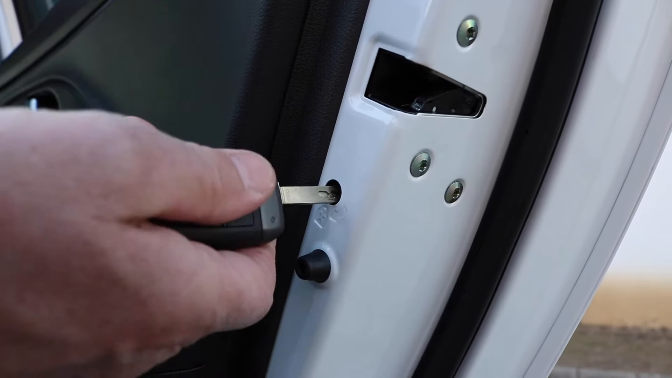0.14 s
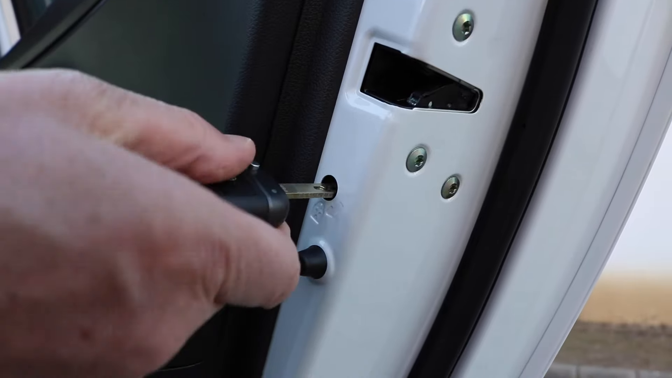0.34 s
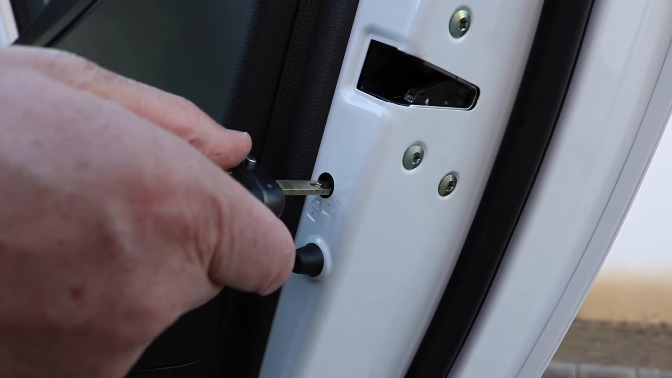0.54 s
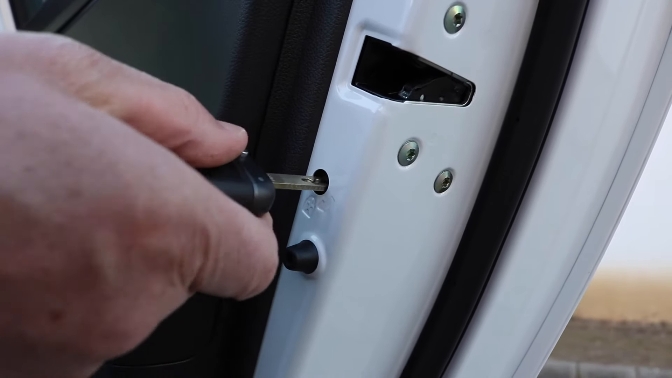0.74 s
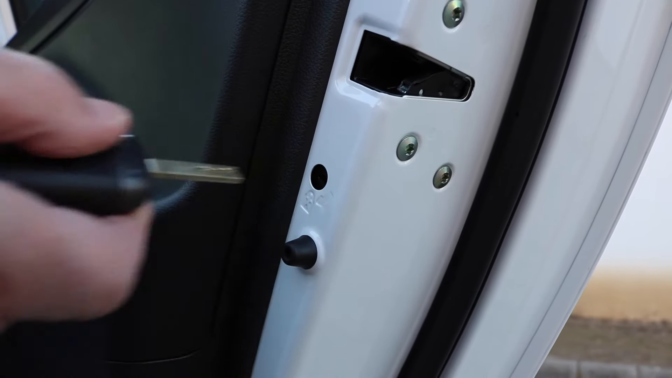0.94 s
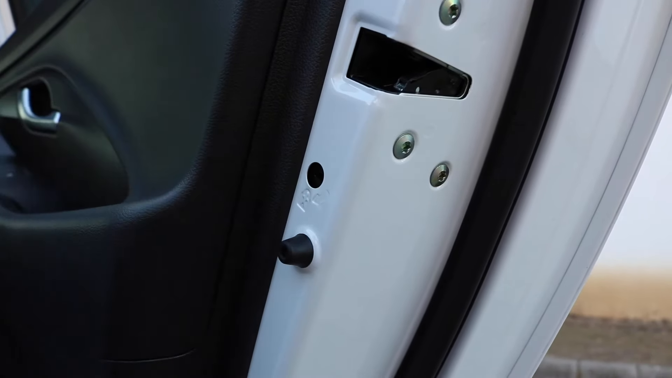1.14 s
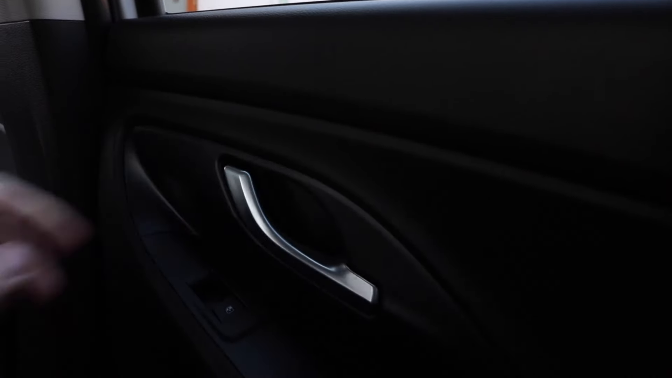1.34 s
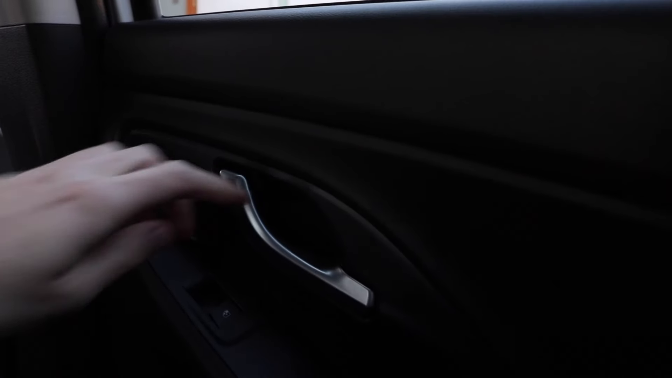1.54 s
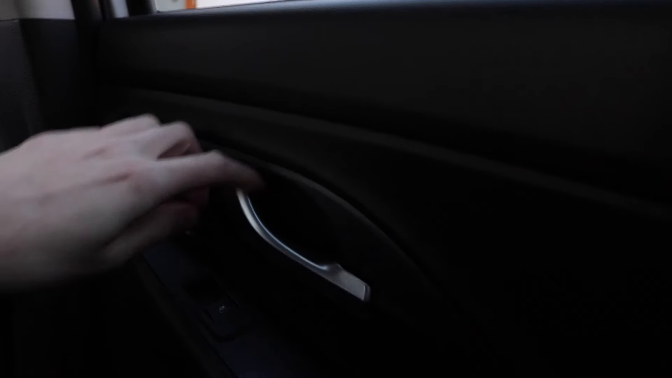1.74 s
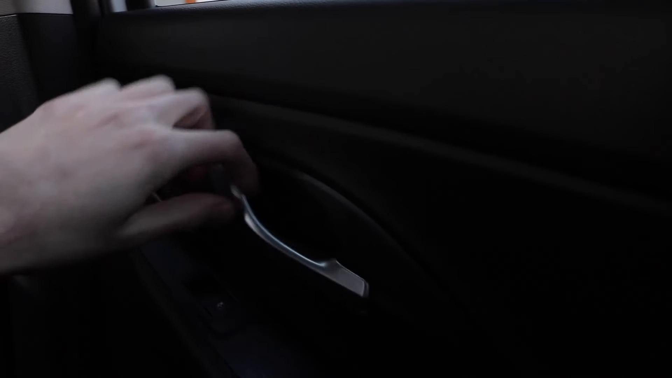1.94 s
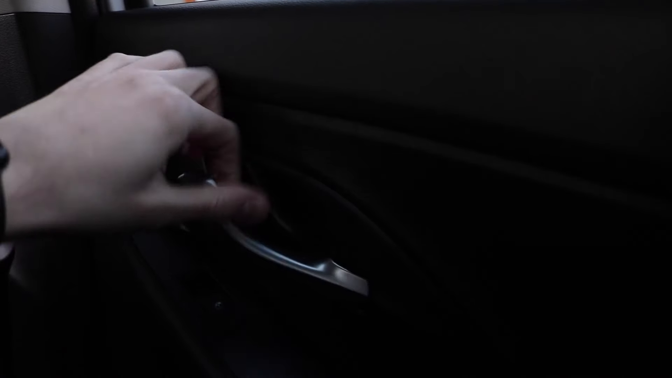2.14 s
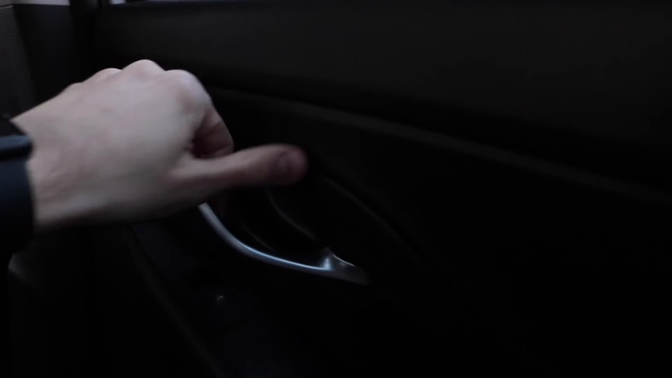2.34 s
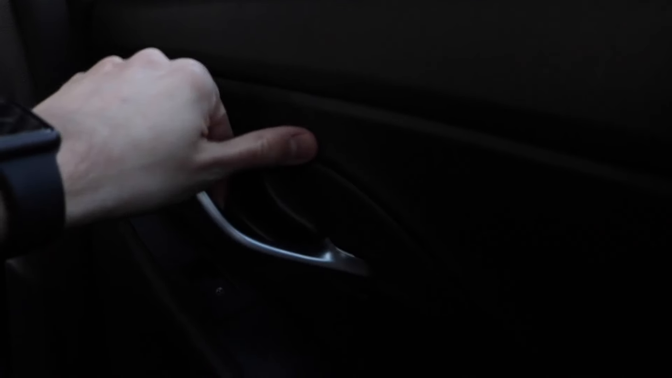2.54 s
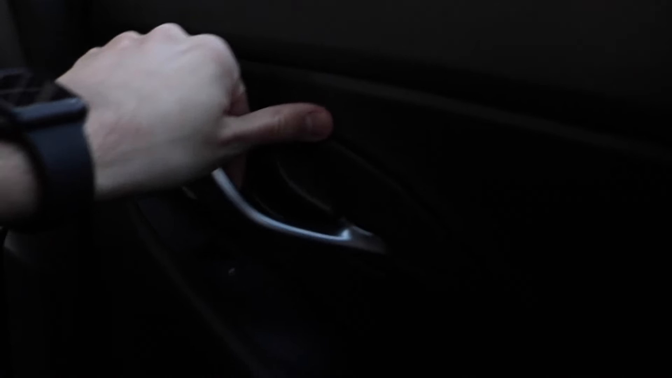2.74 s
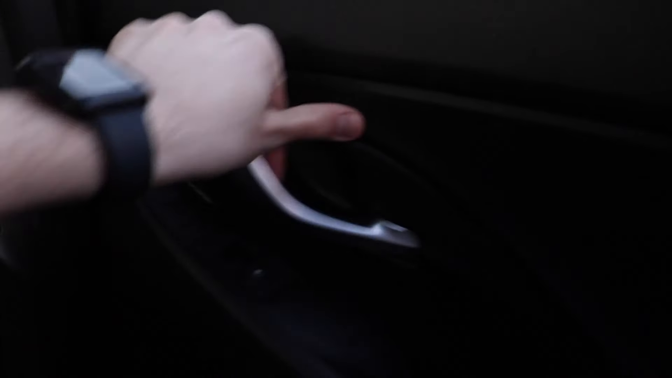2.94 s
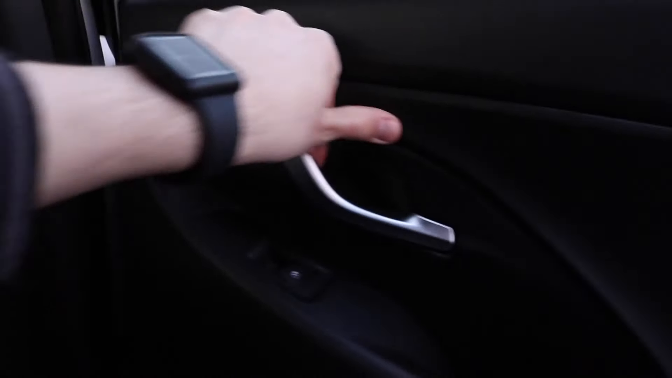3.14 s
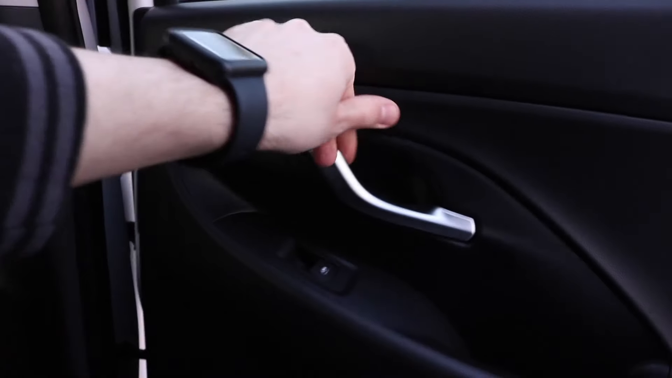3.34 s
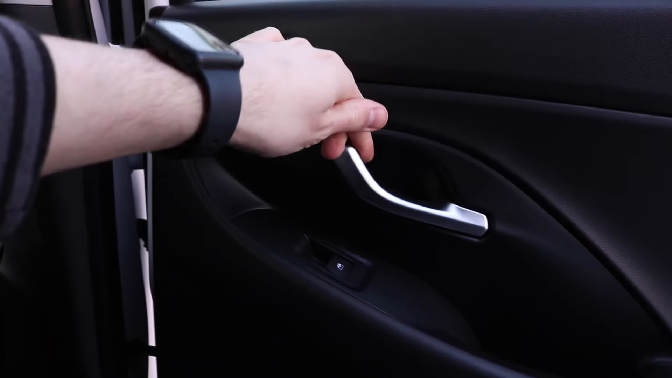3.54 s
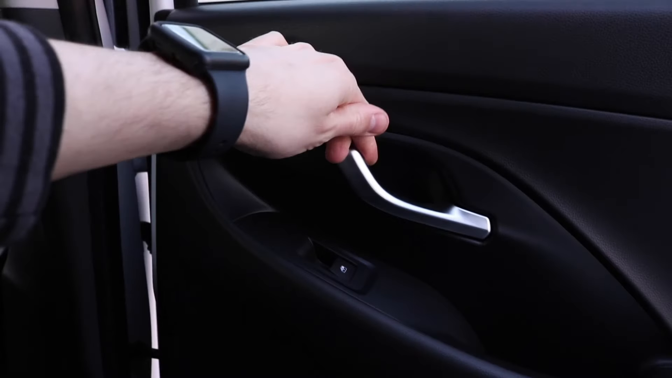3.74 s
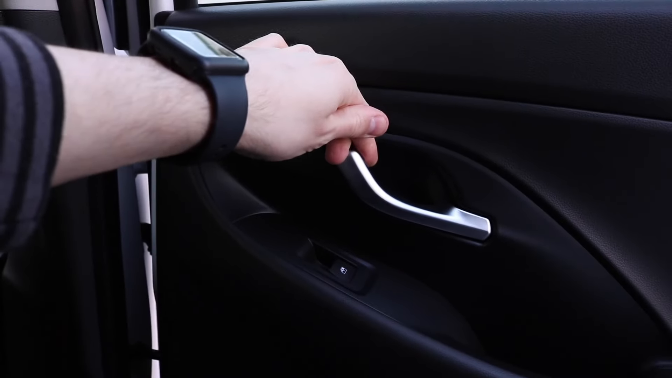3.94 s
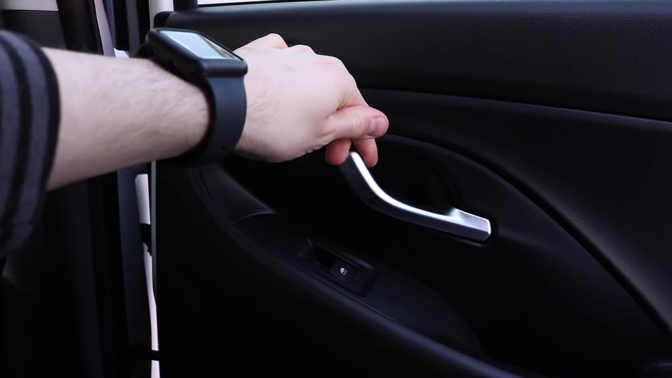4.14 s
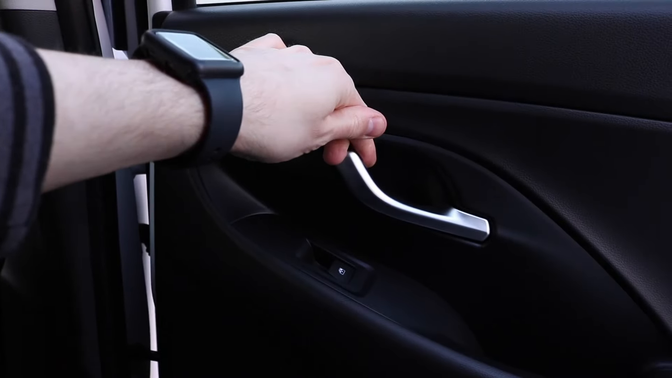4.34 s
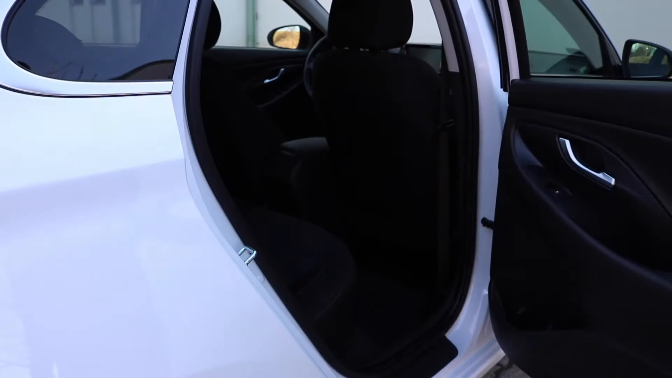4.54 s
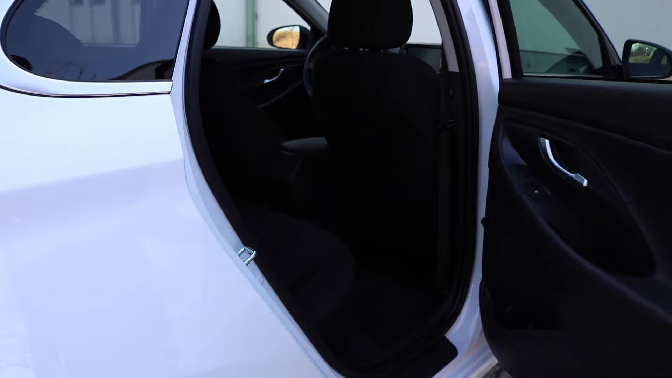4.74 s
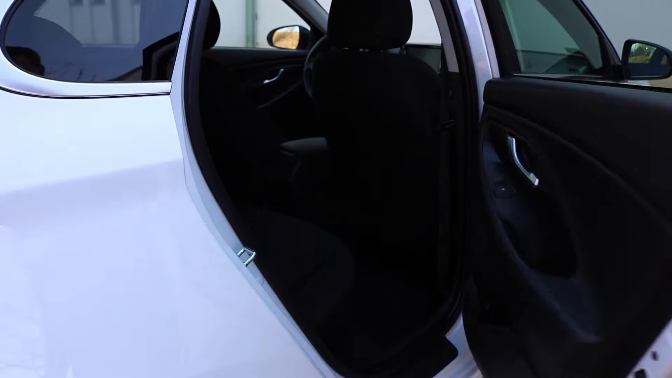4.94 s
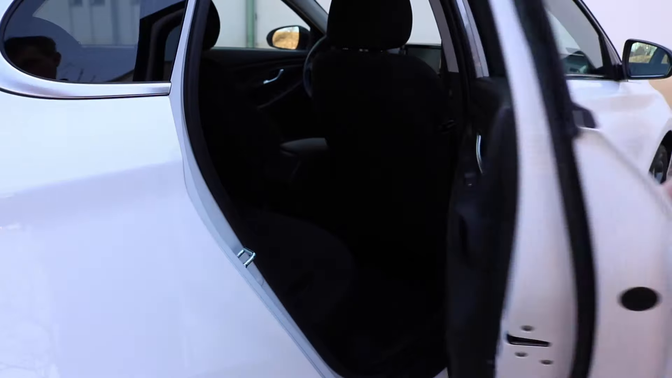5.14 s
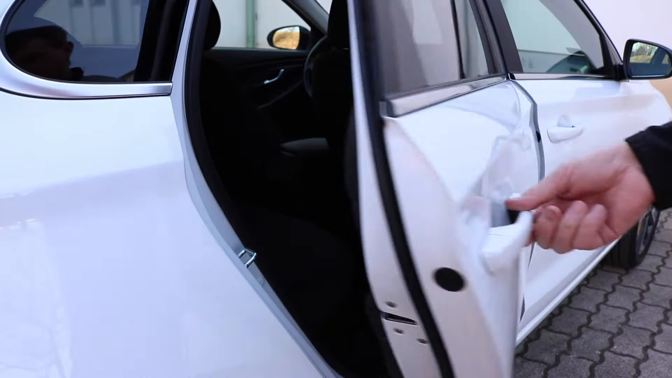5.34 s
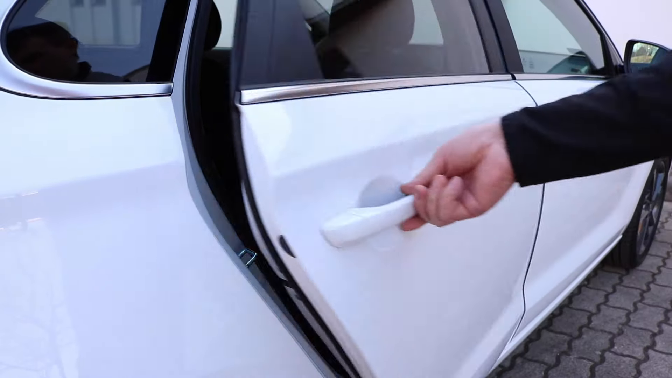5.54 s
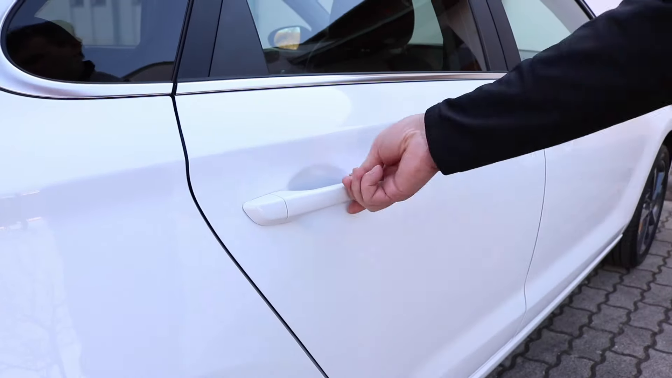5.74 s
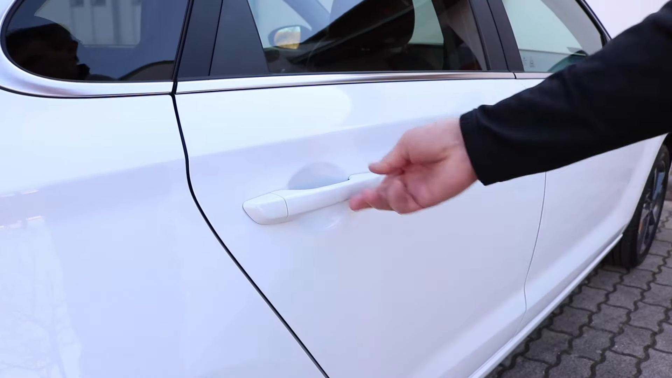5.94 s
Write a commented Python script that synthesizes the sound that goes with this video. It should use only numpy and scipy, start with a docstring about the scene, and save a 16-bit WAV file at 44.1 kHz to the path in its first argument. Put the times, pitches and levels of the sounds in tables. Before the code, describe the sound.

A nearby microphone catches a tiny sharp lock click, light key scrapes, then handle taps and a firm latch clunk. Quiet squeak, creaking and sleeve rustle follow, with small trim knocks and a crisp lever snap. A pause with soft rustle and moving air leads to a loud double clunk as the car door closes, fading quickly into near silence.

```python
"""A car door is heard from close by: pushed shut, its latch meets the striker and the panel slams home.
Before that a key flips the child lock, and a hand pulls the inner handle to let the latch go.
Blows excite decaying modes (sines) and dense clatter (noise bands), low-passed by the contact.
Shaped noise gives the sliding fingers, rustle, scrapes, moved air and faint background;
an unsteady sine gives the squeak of the seal, and trains of tiny blows the creaking lever."""
import sys
import numpy as np
from scipy import signal
from scipy.fft import rfft, irfft
from scipy.io import wavfile
from scipy.ndimage import uniform_filter1d

SR = 44100
rng = np.random.default_rng(int(sys.argv[2]) if len(sys.argv) > 2 else 0)


def waveform_to_disk(signal):
    """Save audio, clipped to [-1, 1], as 16-bit WAV at the path in sys.argv[1]."""
    frames = np.transpose(np.atleast_2d(signal))
    scaled = np.clip(frames, -1, 1) * 32767
    samples = np.round(scaled).astype(np.int16)
    wavfile.write(sys.argv[1], SR, samples)


N = 264600  # samples, 6 s
HZ = np.fft.rfftfreq(N, 1 / SR)
TIME = np.arange(N) / SR


def amp(db):
    """Level to amplitude: 20 dB is a factor of ten."""
    return 10 ** (np.asarray(db) / 20)


def evened(x):
    """Power normalisation: scales a signal to rms 1."""
    return x / np.sqrt(np.mean(x ** 2) + 1e-30)


def burst(x):
    """Energy normalisation: scales a transient to the energy of 10 ms at rms 1."""
    return x * np.sqrt(SR / 100 / np.sum(x ** 2))


def read(points, hz, axis=1):
    """Logarithmic interpolation: one column of a table, in straight lines over log frequency."""
    columns = np.transpose(points)
    return np.interp(np.log(hz + 1), np.log(columns[0] + 1), columns[axis])


def add(mix, s, sound):
    """Superposition: adds a sound into the mix from time s on."""
    part = mix[round(s * SR):][:len(sound)]
    part += sound[:len(part)]


def noise(gain):
    """Spectral shaping: steady noise of rms 1 with a given gain at each frequency."""
    return evened(irfft(rfft(rng.standard_normal(N)) * gain, N))


def unevenness(depth_db, size):
    """Amplitude modulation: a random flutter of rms 1, smoothed over a number of samples."""
    flutter = evened(uniform_filter1d(rng.standard_normal(N), size))
    return evened(amp(depth_db * flutter))


def swells(moves, spectrum):
    """Power summation: noise of one colour under Gaussian swells, one for each move."""
    power = sum((amp(db) * np.exp(-((TIME - s) / half_s) ** 2)) ** 2 for s, half_s, db in moves)
    return np.sqrt(power) * noise(amp(read(spectrum, HZ)))


def ring(modes, t):
    """Modal superposition: decaying sines, listed neighbours starting in opposite directions."""
    tone = np.zeros(len(t))
    for k, (hz, db, t60) in enumerate(modes):
        tone += (-1) ** k * amp(db - 60 * t / t60) * np.sin(2 * np.pi * hz * t)
    return burst(tone)


def clatter(table, t, crack_db, crack_s, rise_cycles=0.69, count=27):
    """High modal density: noise bands crack, then decay at their own rates; bass builds up slowest."""
    centres = np.geomspace(40, 16000, count)[:, None]  # Hz
    # Distance from each band centre, in band spacings
    steps = np.log((np.fft.rfftfreq(len(t), 1 / SR) + 1) / centres) / np.log(centres[1] / centres[0])
    band_gain = np.cos(np.pi / 2 * np.clip(steps, -1, 1))
    bands = irfft(rfft(rng.standard_normal(len(t))) * band_gain, len(t))

    tail = amp(-60 * t / read(table, centres, axis=2))
    crack = amp(crack_db) * np.exp(-t / crack_s)
    rise = 1 - np.exp(-(t * centres / rise_cycles) ** 2)
    bands *= (tail + crack) * rise
    bands /= np.linalg.norm(bands, axis=1, keepdims=True)
    # Band energy is energy per Hz times a bandwidth proportional to the centre
    return burst((bands * amp(read(table, centres)) * np.sqrt(centres)).sum(0))


def struck(blows, modes, dense, crack_db, crack_s, size=16384):
    """Impact excitation: each blow rings an object; a softer contact passes less treble."""
    out, t = np.zeros(N), np.arange(size) / SR
    tone = ring(modes, t)
    for s, ring_db, clatter_db, contact_hz in blows:
        contact = signal.butter(2, min(contact_hz, SR / 2 - 1000), fs=SR)
        rattle = clatter(dense, t, crack_db, crack_s)
        add(out, s, amp(ring_db) * burst(signal.lfilter(*contact, tone)))
        add(out, s, amp(clatter_db) * burst(signal.lfilter(*contact, rattle)))
    return out


def door():
    """Structural resonance: the whole door lands on its seal and shudders in low, slowly dying modes."""
    # Blows of the closing door: (time [s], ring level [dB], clatter level [dB], contact cut-off [Hz])
    blows = [(5.7796, -77, -31, 3030), (5.7831, -24.5, -28, 8800), (5.7966, -46, -36.5, 6860),
             (5.809, -38, -32.5, 1020), (5.817, -50, -44.5, 2400), (5.846, -36.5, -41.5, 890),
             (5.856, -68, -53.5, 2800), (5.884, -68, -57, 2240), (5.9826, -59, -60.5, 3100)]
    # Strongest modes of the door: (frequency [Hz], relative level [dB], t60 [s])
    modes = [(38.9, -4, 0.63), (58, -11, 0.69), (93.2, 5.5, 0.22), (158.4, -4.5, 0.2), (186, -20, 0.284),
             (253, 5.5, 0.11), (291.3, -3.5, 0.38), (318.4, -1, 0.21), (385, 5.5, 0.18), (433, -23, 0.16),
             (494, -12.5, 0.36), (525, -16, 0.45), (600, -3, 0.16), (573, -22, 0.17), (720, -15, 0.2),
             (757, -5, 0.17), (820, -18, 0.26), (878, -7, 0.23), (925, -2, 0.084), (960, -34, 0.16),
             (1030, -25, 0.22), (1110, -9, 0.099), (1070, -18.1, 0.088), (1290, -28, 0.15),
             (1424, -31, 0.15), (1540, -20, 0.21)]
    # Its countless weaker modes: (frequency [Hz], relative energy per Hz [dB], t60 [s])
    dense = [(40, 2.5, 0.39), (150, -4.5, 0.32), (262, 0, 0.26), (446, -3, 0.23), (840, -2.5, 0.13),
             (1400, -7.5, 0.2), (2100, -11.5, 0.16), (2980, -9, 0.057), (3870, -17, 0.12),
             (4830, -19.5, 0.093), (7600, -26, 0.13), (15000, -27, .045)]
    return struck(blows, modes, dense, crack_db=4, crack_s=0.0028)


def striker():
    """Impact excitation: after a soft knock on the door, the latch rides onto the striker and rings it."""
    # Soft knock of hand or check strap on the door, then blows on the striker:
    # (time [s], ring level [dB], clatter level [dB], contact cut-off [Hz])
    blows = [(5.191, -55.5, -69, 260), (5.7511, -27.5, -33.5, 2300), (5.76, -31.5, -30, 1000),
             (5.7673, -36, -31.5, 950)]
    # Strongest modes: (frequency [Hz], relative level [dB], t60 [s])
    modes = [(106, -37, 0.26), (167, -32, 0.2), (257, -12, 0.18), (341, -10.5, 0.14), (431.5, -15, 0.24),
             (572, -1, 0.054), (744, -3.5, 0.015), (788, -14, 0.13), (899, -18.5, 0.29), (1256, -30, 0.064)]
    # Countless weaker modes: (frequency [Hz], relative energy per Hz [dB], t60 [s])
    dense = [(40, -14, 0.26), (150, -5.5, 0.19), (400, -3.5, 0.24), (754, -9.5, 0.12), (1260, -10, 0.16),
             (2000, -23, 0.18), (4020, -27.5, 0.33), (8000, -24, 0.099), (15100, -12, .03)]
    return struck(blows, modes, dense, crack_db=-36, crack_s=0.0054)


def thuds(rise_cycles=0.12):
    """Damped oscillation: knocks and soft bumps flex the broad door skin, which shoves the air."""
    # Flexing of the skin: (time [s], level before rise and decay [dB], frequency [Hz], t60 [s])
    bumps = [(.411, -53, 277, 0.11), (1.315, -62.5, 87.5, .3), (1.731, -61, 220, .09),
             (2.3364, -19.5, 123, 0.048), (2.35, -27, 245.4, .12), (2.803, -46.5, 242, 0.092),
             (3.1164, -39, 400, 0.038), (5.1932, -42.5, 428, 0.036), (5.752, -25.5, 642, 0.039),
             (5.7836, -9, 860, 0.0058), (5.7847, -30.5, 93, 0.15), (5.8103, -21.5, 328, .03)]
    out, t = np.zeros(N), TIME[:SR // 4]
    for s, db, hz, t60 in bumps:
        rise = 1 - np.exp(-t * hz / rise_cycles)
        add(out, s, amp(db - 60 * t / t60) * np.sin(2 * np.pi * hz * t) * rise)
    return out


def latch():
    """Impact excitation: the latch lets go with a thump of low modes and a sharp crack."""
    # Blows in the latch: (time [s], ring level [dB], clatter level [dB], contact cut-off [Hz])
    blows = [(2.338, -39, -55, 430), (2.3452, -30.5, -33, 4900), (2.3487, -25, -41.5, 1420),
             (2.3585, -50, -49.5, 3500), (2.3719, -42, -47.5, 4200)]
    # Strongest modes of the latch: (frequency [Hz], relative level [dB], t60 [s])
    modes = [(44.2, -16, 0.24), (73.5, -12, 0.33), (109.5, -8, 0.3), (168.2, -10.5, 0.3),
             (252.4, 3.5, 0.099), (280, -38, 0.28), (326.5, -11, 0.12), (468.4, 0.1, 0.054),
             (550, -14, 0.072), (737, -7, 0.048), (790, -32, 0.23), (984, -1, 0.028), (1170, -43, 0.12),
             (1356, -23.5, 0.11), (1930, -34, 0.046), (1690, 0, 0.024)]
    # Its countless weaker modes: (frequency [Hz], relative energy per Hz [dB], t60 [s])
    dense = [(49.5, -7, 0.26), (249, 7.5, 0.29), (604, 2, 0.11), (1040, -0.5, 0.14), (1500, -14, 0.069),
             (2050, 0, 0.082), (2520, -36, 0.071), (3160, -5.5, 0.078), (4100, -9.5, 0.053),
             (4800, -25, 0.1), (6560, -26, 0.054), (15000, -31, 0.047)]
    return struck(blows, modes, dense, crack_db=9, crack_s=0.0013)


def rebounding(touches, ring_db, rebound_db):
    """Inelastic rebound: each light touch becomes a landing and one weaker blow after it."""
    rebound_s = 0.0096
    blows = []
    for s, db, contact_hz in touches:
        for delay, loss in ((0, 0), (rebound_s, rebound_db)):
            blows.append((s + delay, db + loss + ring_db, db + loss, contact_hz))
    return blows


def slips(ring_db=-14, count=24):
    """Stick-slip friction: the loaded lever creaks in tiny blows of uneven spacing and strength."""
    # Spells under load: (start [s], end [s], mean slip rate [1/s], mean clatter level [dB])
    creaks = [(2.55, 2.86, 32, -71.5), (3.322, 3.46, 45, -72.5)]
    spread_db, contact_hz = 2.5, 4500  # standard deviation of level, contact cut-off
    blows = []
    for start, end, rate, db in creaks:
        gaps, sizes = rng.uniform(.5, 1.5, count), rng.standard_normal(count)
        times, levels = start + np.cumsum(gaps) / rate, db + spread_db * sizes
        blows += [(s, level + ring_db, level, contact_hz) for s, level in zip(times, levels) if s < end]
    return blows


def lever():
    """Impact excitation: the handle's lever clicks, knocks, creaks and snaps back."""
    # Blows on the lever: (time [s], ring level [dB], clatter level [dB], contact cut-off [Hz])
    blows = [(2.3365, -58, -53.5, 2500), (2.341, -64, -56, 2500), (2.668, -65, -56.5, 2920),
             (2.719, -64, -63, 2400), (3.6396, -37, -43, 10100)]
    # Light touches on the lever: (time [s], clatter level [dB], contact cut-off [Hz])
    touches = [(1.9874, -55, 3780), (2.0715, -60.5, 890), (2.106, -68, 1140), (2.174, -67, 1790),
               (3.339, -62, 2260), (4.466, -67, 700), (4.496, -64, 1070)]
    # Strongest modes of the lever: (frequency [Hz], relative level [dB], t60 [s])
    modes = [(125, -31, 0.23), (224, -22, 0.07), (356, -14.5, 0.072), (545, -6, 0.021), (646, -6, 0.015),
             (874, -46, 0.14), (1283, -18.5, 0.049), (1600, -6.5, 0.034), (1693, -8.5, 0.015),
             (2420, -11.5, 0.0042), (3500, -9, 0.007), (4130, -8.5, 0.012), (5120, -0.5, 0.0055),
             (6850, -4, 0.0048)]
    # Its countless weaker modes: (frequency [Hz], relative energy per Hz [dB], t60 [s])
    dense = [(50, -17, 0.21), (149, -0.5, 0.2), (514, 2, 0.074), (950, -5, 0.076), (1680, 1, 0.074),
             (2750, -10, 0.043), (4200, -7.5, 0.04), (5360, -7, 0.054), (6960, 0, 0.018),
             (9900, -14, 0.041), (15000, -15, .022)]
    all_blows = blows + slips() + rebounding(touches, ring_db=-13, rebound_db=-3.5)
    return struck(all_blows, modes, dense, crack_db=-2, crack_s=0.00079)


def trim():
    """Impact excitation: knocks and light touches ring the plastic trim."""
    # Blows on the trim: (time [s], ring level [dB], clatter level [dB], contact cut-off [Hz])
    blows = [(3.061, -76, -52, 4060), (3.1154, -39.5, -46.5, 9800), (3.1476, -56, -47, 1580),
             (3.151, -44.5, -57, 1190)]
    # Light touches on the trim: (time [s], clatter level [dB], contact cut-off [Hz])
    touches = [(1.730, -73, 600), (2.635, -68, 900), (2.803, -53, 2220), (2.908, -65.5, 1500),
               (3.0415, -51, 1700)]
    # Strongest modes of the trim: (frequency [Hz], relative level [dB], t60 [s])
    modes = [(117, -31, 0.16), (196, -13, 0.13), (235, -8, 0.084), (354, 2.5, 0.043), (457, 2.5, 0.051),
             (655, -11, 0.048), (863, -9, 0.041), (1130, -16, 0.043), (1490, -5.5, 0.0095)]
    # Its countless weaker modes: (frequency [Hz], relative energy per Hz [dB], t60 [s])
    dense = [(50, -19, 0.2), (204, 12, 0.19), (437, 3.5, 0.021), (1010, -2.5, .05), (1600, -10, 0.058),
             (2540, -7, 0.019), (3780, -14.5, 0.024), (8000, -12, 0.059), (15000, -13, 0.037)]
    all_blows = blows + rebounding(touches, ring_db=-16, rebound_db=-2.0)
    return struck(all_blows, modes, dense, crack_db=-33, crack_s=0.00068)


def child_lock():
    """Impact excitation: the key snaps the small lock lever over and is drawn out."""
    # Blows of the key: (time [s], ring level [dB], clatter level [dB], contact cut-off [Hz])
    blows = [(.3273, -62, -49, 5000), (.3286, -43.5, -49.5, 9000), (.3345, -59, -66, 6000),
             (.341, -64.5, -68, 6000), (.4085, -77, -56.5, 4500), (.422, -84, -66, 9000),
             (.6985, -83, -66, 1470), (.913, -68, -64.5, 1220)]
    # Strongest modes of key and lock: (frequency [Hz], relative level [dB], t60 [s])
    modes = [(276, -17, 0.15), (1244, -14, 0.11), (1790, 1.5, 0.024), (2920, 1.5, 0.013), (3500, -4, 0.025),
             (4340, 0.5, 0.013), (4920, 3.5, 0.011)]
    # Their countless weaker modes: (frequency [Hz], relative energy per Hz [dB], t60 [s])
    dense = [(100, -22, .1), (350, -6, 0.14), (660, 1.5, 0.091), (1300, 1, 0.064), (1980, 3.5, 0.013),
             (3180, -7, 0.049), (4800, -5.5, 0.086), (6300, -7, 0.016), (9900, -6, 0.019),
             (15000, -7, .018)]
    return struck(blows, modes, dense, crack_db=14, crack_s=0.0012)


def slides(grain_db=1.5, size=120):
    """Sliding friction: skin hisses over grained plastic, louder and softer with the finger's speed."""
    # Strokes of the fingers: (start [s], end [s], level [dB], pitch factor of the hiss [ratio])
    strokes = [(2.36, 2.425, -63.5, 1.04), (2.404, 2.433, -62, 1.1), (2.644, 2.876, -73.5, 0.8),
               (3.022, 3.095, -70, 1.3), (3.313, 3.402, -61, 0.98), (3.353, 3.423, -61, 1.05)]
    # Colour of the hiss: (frequency [Hz], relative level per Hz [dB])
    hiss = [(800, -19), (1900, -4.5), (4000, -5), (6500, -3.5), (8300, 5), (10500, -7), (13500, -3.5),
            (16000, -16)]
    out = np.zeros(N)
    for start, end, db, brightness in strokes:
        speed = np.sin(np.pi * np.clip((TIME - start) / (end - start), 0, 1))
        out += amp(db) * speed * noise(amp(read(hiss, HZ / brightness)))
    return out * unevenness(grain_db, size)


def rubbing():
    """Surface friction: cloth and skin rustle softly; hard parts scrape in finer, sharper grains."""
    # Moves of hand, sleeve and door along its seal: (peak time [s], half length [s], level [dB])
    moves = [(.22, 0.12, -71), (.44, 0.043, -66.5), (.65, 0.49, -76), (1.845, 0.012, -71),
             (2.28, 0.099, -70), (2.75, .14, -63), (3.1, 0.14, -66.5), (3.39, 0.14, -67.5),
             (4.505, 0.046, -63), (4.85, 0.34, -75), (5.205, 0.047, -63.5), (5.745, 0.032, -59.5)]
    # Colour of the rustle: (frequency [Hz], relative level per Hz [dB])
    rustle_colour = [(30, -7), (120, 0), (230, -1), (400, -8), (800, -13.5), (2000, -28.5), (6000, -33),
                     (16000, -55)]
    # Key in its slot, nails on the lever, loose door parts: (peak time [s], half length [s], level [dB])
    scrapes = [(.327, .03, -65.5), (.86, 0.055, -73), (1.0, .025, -76), (1.86, 0.042, -69.5),
               (3.445, 0.0084, -63.5), (5.884, .018, -64.5)]
    # Colour of the dry scrape: (frequency [Hz], relative level per Hz [dB])
    scrape_colour = [(100, -15), (600, -2.5), (1700, -3), (4500, -10.5), (9000, -20), (16000, -40)]
    rustle = swells(moves, rustle_colour) * unevenness(depth_db=2.5, size=200)
    return rustle + swells(scrapes, scrape_colour) * unevenness(depth_db=4.5, size=120)


def swing():
    """Air displacement: the moving door pushes out low wafts, made of swelling noise."""
    # Door leaves its seal, starts to swing, passes its stay, closes:
    # (peak time [s], half length [s], level [dB])
    wafts = [(2.48, 0.065, -57.5), (5.06, .06, -60.5), (5.34, 0.048, -60.5), (5.7, 0.17, -68.5)]
    # Colour of the moved air: (frequency [Hz], relative level per Hz [dB])
    waft_colour = [(15, -2.5), (35, -1.5), (75, -8), (150, -21), (500, -35), (4000, -74)]
    return swells(wafts, waft_colour)


def squeak(jitter=0.032, size=250):
    """Stick-slip oscillation: the rubber seal squeaks at an unsteady pitch, in one arch of level."""
    # Glide of the squeak as the door eases open: (time [s], pitch [Hz])
    glide = [(2.5, 620), (2.58, 678), (2.639, 586), (2.7, 640), (2.82, 591)]
    level_db = -70
    s, hz = np.transpose(glide)
    wobble = jitter * evened(uniform_filter1d(rng.standard_normal(N), size))
    pitch = np.interp(TIME, s, hz) * (1 + wobble)
    tone = np.sin(2 * np.pi * np.cumsum(pitch) / SR)
    arch = np.sqrt(np.abs(np.sin(np.pi * np.clip((TIME - s[0]) / (s[-1] - s[0]), 0, 1))))
    return amp(level_db) * arch * tone * unevenness(depth_db=5.0, size=600)


def air():
    """Partial coherence: a faint rumble largely shared by both sides, under mostly separate hiss."""
    # Still air and microphone hiss: (frequency [Hz], relative level per Hz [dB])
    colour = [(12, -24), (28, -2), (45, -16), (65, -15), (130, -11.5), (200, -18), (300, -19), (550, -21.5),
              (1100, -24.5), (4000, -28), (15500, -30)]
    # Left-right likeness: (frequency [Hz], coherence [ratio])
    likeness = [(60, 0.68), (150, 0.64), (380, 0.37), (950, 0.25), (2380, 0.15), (5980, 0.03),
                (15000, 0.027)]
    mid_db = -69  # rms of the part common to both sides
    same = np.clip(read(likeness, HZ), -1, 1)
    mid, side = rfft(rng.standard_normal((2, N))) * amp(read(colour, HZ))
    side = side * np.sqrt((1 - same) / (1 + same + 1e-6))
    mid, side = irfft(mid, N), irfft(side, N)
    return amp(mid_db) * np.array([mid + side, mid - side]) / np.std(mid)


def scene():
    """Linear superposition: all but the air is equal on both sides, close by and straight ahead."""
    # Striker, slam, and the knocks and soft bumps throughout
    door_sounds = striker() + door() + thuds()
    handle = lever() + trim() + latch()
    friction = rubbing() + squeak() + slides()
    return door_sounds + handle + child_lock() + friction + swing() + air()


def record(dry):
    """Band limitation: a linear-phase low-pass ends the treble near 15850 Hz."""
    lowpass = signal.firwin(511, 15850, window=("kaiser", 8), fs=SR)
    return signal.oaconvolve(dry, lowpass[None], "same", axes=1)


dry = scene()
out = record(dry)
waveform_to_disk(out)
```